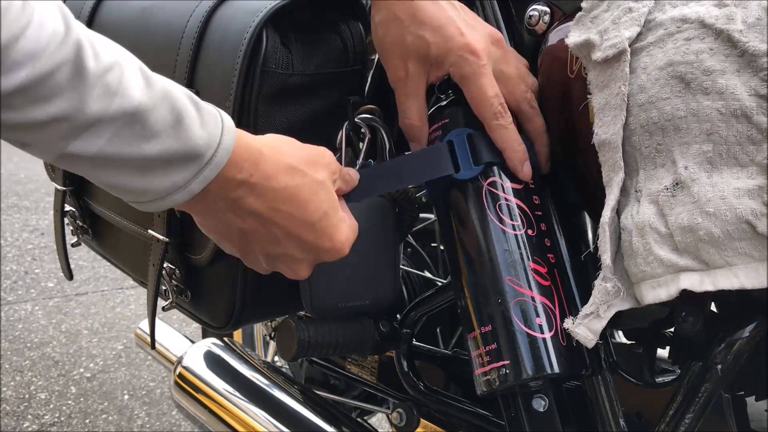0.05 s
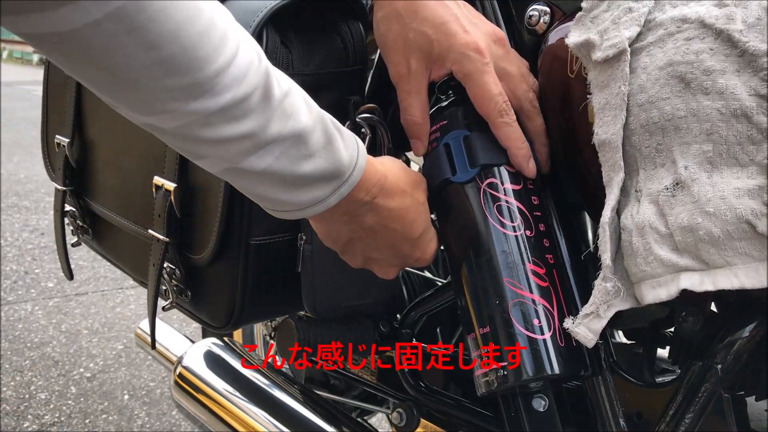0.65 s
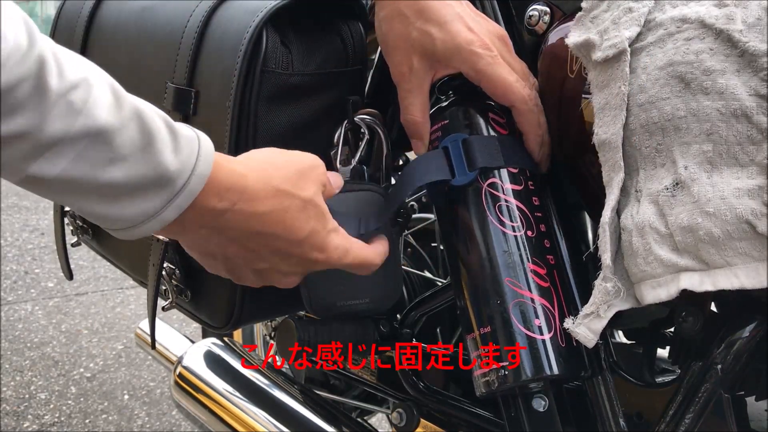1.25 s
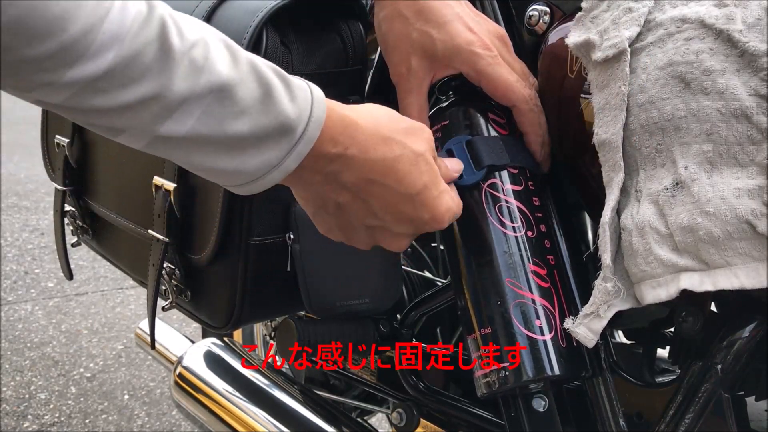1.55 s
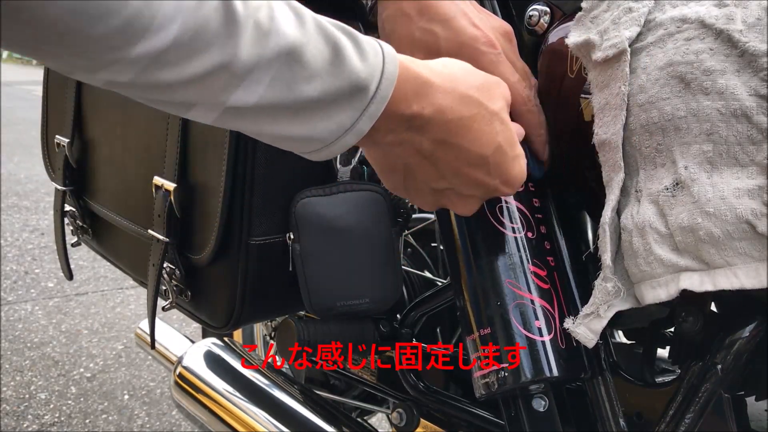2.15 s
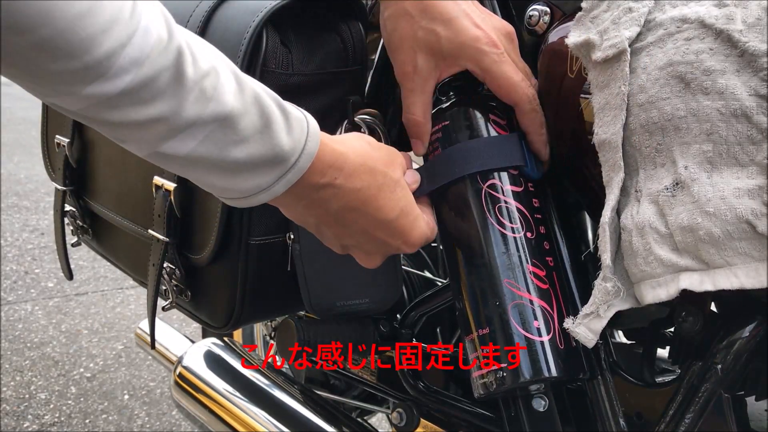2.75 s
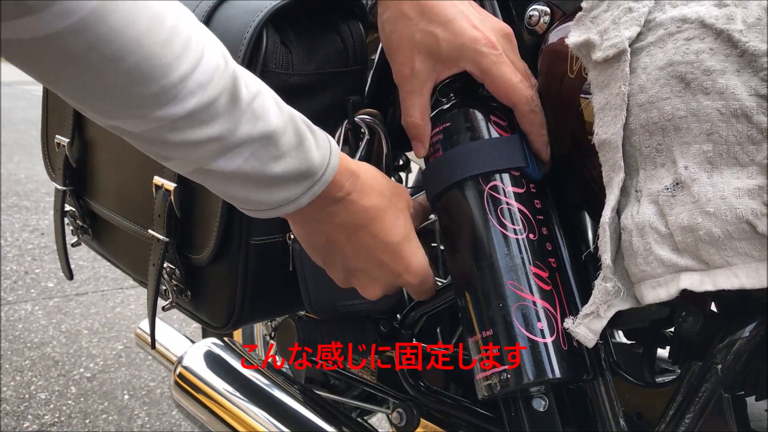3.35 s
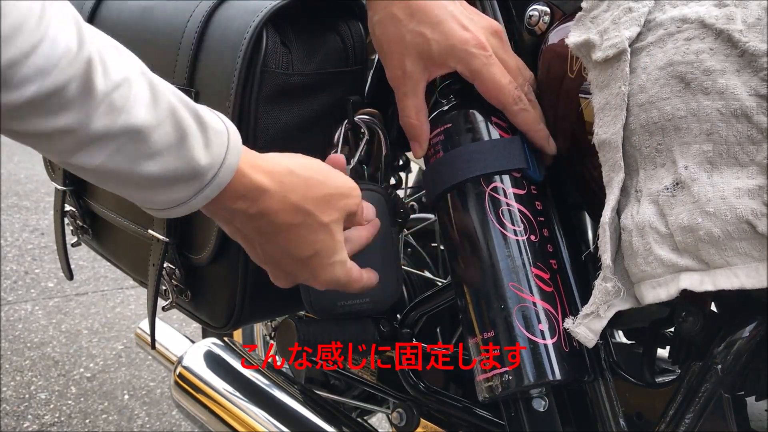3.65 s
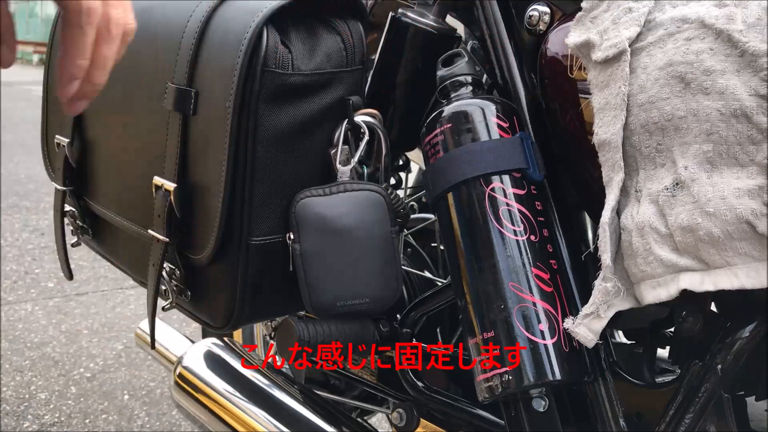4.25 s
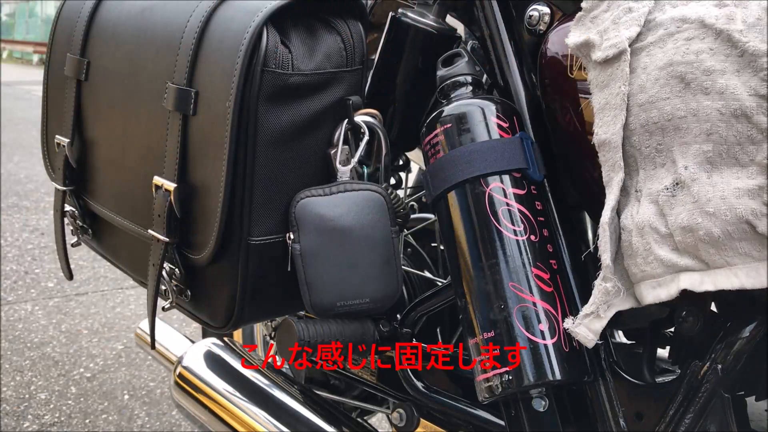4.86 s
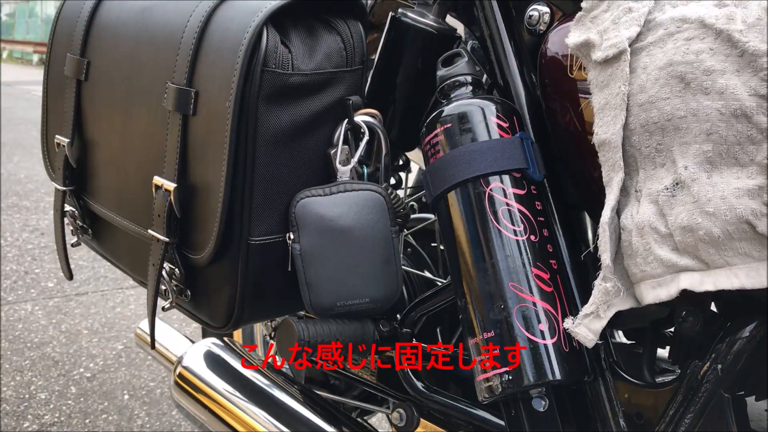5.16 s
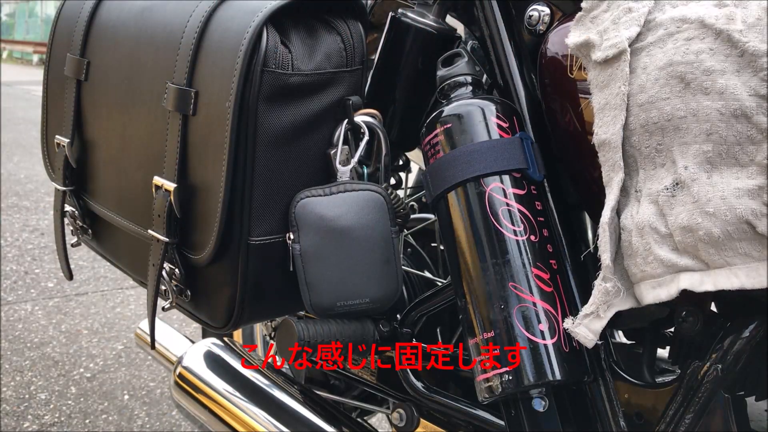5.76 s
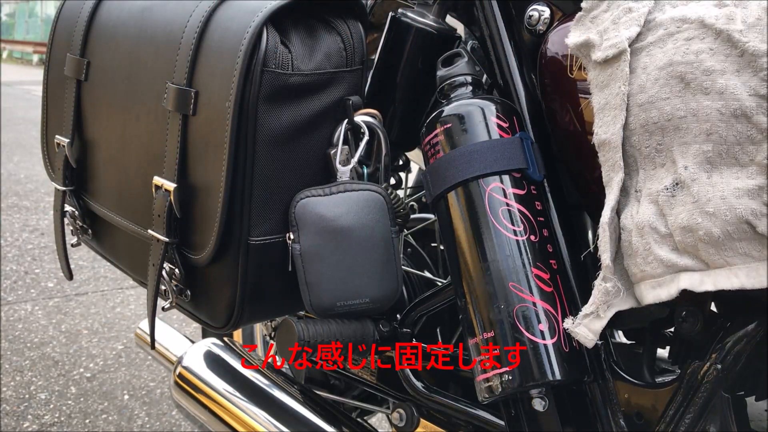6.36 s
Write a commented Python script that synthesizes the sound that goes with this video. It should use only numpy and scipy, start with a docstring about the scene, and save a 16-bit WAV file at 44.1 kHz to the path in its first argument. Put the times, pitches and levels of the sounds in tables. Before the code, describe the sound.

A webbing strap hisses, ticks and creaks tight around a knocking metal bottle, then shoes shuffle on gritty asphalt over a low outdoor rumble.

```python
"""Outdoors, close by, a webbing strap is pulled tight round a metal bottle on a parked motorcycle.
First the webbing hisses through its buckle, and the bottle knocks and rings against its mount.
From about 3 seconds, hard pulls make the strap stick and slip, so it ticks and creaks.
From about 4.5 seconds, shoes shuffle on gritty asphalt, with faint high chirps before and after.
All along there is a low rumble, and a faint distant whine grows and swells twice."""
import sys
import numpy as np
from scipy import signal
from scipy.fft import rfft, irfft, next_fast_len
from scipy.io import wavfile
from scipy.ndimage import uniform_filter1d, map_coordinates

SR = 44100
rng = np.random.default_rng(int(sys.argv[2]) if len(sys.argv) > 2 else 0)


def put_to_file(sound):
    """Save the sound as 16-bit audio at rate SR, in the file named by the first command-line argument."""
    columns = np.atleast_2d(sound).T  # one column per channel
    safe = np.clip(columns, -1, 1)
    whole_steps = np.round(safe * 32767)
    wavfile.write(sys.argv[1], SR, whole_steps.astype(np.int16))


N = 291368
T = np.arange(SR // 3) / SR  # seconds within one hit
TOP_HZ = 16000  # the highest pitch kept

# tone of the deep rumble, outdoors and in a footstep: pitch_hz, level_db
RUMBLE_TONE = [(15, -64.5), (25, -45.5), (38, -4), (56, 5), (80, 0), (110, -3.5), (150, -8), (220, -17),
               (400, -46)]
# tone of the soft rush, in the air and in a footstep: pitch_hz, level_db
AIR_TONE = [(100, -5.5), (220, 3), (400, -3.5), (800, -9.5), (960, -5.5), (1200, -9), (1650, -17),
            (2000, -16), (2450, -15.5), (2800, -18), (5000, -22), (8000, -27.5), (12500, -27),
            (16000, -28.5)]


def webbing():
    """Threads catch on the buckle, rasp and hiss; the bottle under the strap adds a duller rub."""
    # the hand feeds webbing through the buckle: start_s, length_s, level_db
    slide_times = [(0, 0.12, -66.5), (.37, 0.39, -67), (.52, 0.073, -66), (.93, 0.21, -56),
                   (1.345, 0.007, -58.5), (1.63, 0.22, -60.5), (1.82, 0.26, -55), (2.18, .03, -63.5),
                   (2.25, .38, -57.5), (2.67, 0.077, -56), (2.8, 0.06, -67), (2.885, 0.055, -52.5),
                   (3.03, 0.12, -51), (3.46, 0.17, -55), (3.72, 0.13, -73.5)]
    # hard pulls drag the tight strap round the bottle: start_s, length_s, level_db
    haul_times = [(.945, 0.12, -59), (1.06, 0.071, -52), (1.84, 0.21, -70), (3.18, 0.063, -50),
                  (3.44, 0.12, -53)]
    # quick tugs and brushes of the webbing: start_s, length_s, level_db
    tug_times = [(.245, 0.01, -60), (.322, 0.0093, -56), (.8, 0.057, -53), (1.06, 0.081, -41),
                 (1.249, 0.0064, -45.5), (1.263, 0.0092, -42), (1.412, 0.01, -47.5), (2.875, 0.06, -47),
                 (3.325, 0.054, -49.5)]
    # tone of the catching threads: pitch_hz, level_db
    weave_tone = [(700, -9), (1200, -9), (1550, 1), (2100, -11), (3000, -6), (4200, -0.5), (5000, -4),
                  (6300, 3.5), (7200, -2), (9000, 0), (10300, -4), (12000, 0.5), (16000, -2.5)]
    # tone of the strap rubbing the bottle: pitch_hz, level_db
    rub_tone = [(120, -53), (250, 2), (600, -1.5), (1100, -0.5), (1800, -3.5), (3500, -15), (8000, -69)]
    slides = strokes(slide_times, rise_s=0.052, fall_s=0.034)
    hauls = strokes(haul_times, rise_s=0.03, fall_s=0.018)
    tugs = strokes(tug_times, rise_s=0.0012, fall_s=0.0079)
    threads = friction(weave_tone, per_s=1200, spread_db=12.5, smooth=1.9)
    threads += amp(-7.5) * grains(per_s=1700, centre_hz=4530, octaves=1.287, cycles=13, spread_db=8)
    hiss = slides * amp(1.5 + 1.3 * wobble(60)) * patchy(threads, depth_db=2.8)
    rasp = tugs * patchy(friction(weave_tone, per_s=3300, spread_db=6.5, smooth=0.37), depth_db=1)
    rubbing = hauls + amp(-15) * slides  # every slide also rubs the bottle lightly
    return hiss + rasp + rubbing * friction(rub_tone, per_s=900, spread_db=10, smooth=1)


def slips(middling_db=-16, scatter_db=1.5):
    """Each slip is a sharp tick that plucks the tight strap and scatters off the parts around."""
    # single slips of the strap: start_s, level_db, ring_db
    single_slips = [(.5238, -40.5, -4), (.9303, -30, -9), (3.045, -25.5, -19), (3.1011, -25.5, -22),
                    (3.175, -20, -11.5), (3.1872, -20, -10), (3.2521, -18, -31), (3.2854, -21, -14.5),
                    (3.3245, -33, -23), (3.4128, -12.5, -6.5), (3.4224, -19, -13), (3.438, -9.5, -8),
                    (3.4527, -22, -4), (3.798, -32.5, -13), (3.874, -37, -33)]
    # tone of one slip: pitch_hz, level_db
    tick_tone = [(200, -19), (900, -15.5), (2200, -15), (4000, -9.5), (5800, -5.5), (8000, -11),
                 (11000, -15.5), (16000, -22.5)]
    # low notes of the tight strap on the bottle: pitch_hz, level_db, fade_s
    low_notes = [(1400, -22, 0.01), (1480, -5, 0.059), (1733, 2, 0.032)]
    # its high notes: pitch_hz, level_db, fade_s
    high_notes = [(2990, -7.5, 0.059), (3128, -1.5, 0.017), (3600, -3.5, 0.011), (4470, 2, 0.0072),
                  (5460, -1.5, 0.016)]
    out = np.zeros(N)
    tick = click(tick_tone)
    for start_s, db, ring_db in single_slips + creaks():
        # every slip favours different notes
        low = [(hz, level + scatter_db * rng.normal(), fade_s) for hz, level, fade_s in low_notes]
        high = [(hz, level + scatter_db * rng.normal(), fade_s) for hz, level, fade_s in high_notes]
        low_db = -11 + 0.34 * (db - middling_db)  # stronger slips sound deeper
        pluck = amp(low_db) * ring(low, detune=0.032) + amp(-2.5) * ring(high, detune=0.025)
        echoes = amp(-18) * noise(tick_tone, size=len(T)) * (fade(0.027) + amp(-25) * fade(0.74))
        add(out, start_s, amp(db - 1) * (tick + amp(ring_db) * pluck + echoes))
    return out


def creaks(jitter_s=0.0003, scatter_db=1.9):
    """A steady pull makes the strap stick and slip almost evenly: rows of start_s, level_db, ring_db."""
    # runs of slips: start_s, length_s, gap_s, first_level_db, fading_db_per_s, ring_db
    runs = [(3.199, .045, .0096, -18, 70, -16), (3.4699, .1, .015, -21.5, 140, -2)]
    rows = []
    for start_s, length_s, gap_s, first_db, fading_db_per_s, ring_db in runs:
        for t in np.arange(0, length_s, gap_s):
            slip_s = start_s + t + jitter_s * rng.normal()
            slip_db = first_db - fading_db_per_s * t + scatter_db * rng.normal()
            rows.append((slip_s, slip_db, ring_db))
    return rows


def bottle_knocks(bounces=3, dulling=0.91, middling_db=-16):
    """The mount thuds and clatters, duller at each bounce, and the bottle's thin wall rings."""
    # the bottle hits its mount:
    # start_s, level_db, bounce_gap_s, bounce_loss_db, thud_db, metal_db, brightness_hz, favoured_hz
    blows = [(0.215, -36, 0.0064, 15, -21, -11.5, 2960, 2700),
             (.653, -27, 0.014, 0.5, -23.5, -21, 4360, 1350),
             (1.879, -22.5, 0.0064, 6.5, -22, -15, 3000, 1800),
             (2.219, -13.5, .014, 3, -22.5, 0, 11400, 2700),
             (3.0504, -18, .007, 10, -23.5, -19, 3120, 1800),
             (3.66, -16.5, 0.0096, 3, -19, -7.5, 6460, 5400)]
    # notes of the metal wall: pitch_hz, level_db, fade_s
    wall_notes = [(662, -15, .09), (1254, -8, .08), (1352, -13.5, .1), (1860, -12, .06), (2379, -13, .1),
                  (2681, -.5, .12), (3332, -11, .11), (3750, -13, .07), (3933, -8, .08), (3980, -8, .08),
                  (4258, -9, .14), (4382, -6, .11), (4451, -6, .08), (4525, -7, .08), (4580, -1, .11),
                  (5310, -13, .12), (5440, -8, .14), (5787, -11, .06), (6400, -14, .07), (7200, -14, .1),
                  (7650, -15, .08), (9292, -12, .1)]
    # low notes of the mount: pitch_hz, level_db, fade_s
    mount_notes = [(175, -0.5, 0.038), (220, 1.5, 0.078), (253, 0, 0.12), (309.4, 2, 0.1),
                   (432, -8.5, 0.081)]
    # tone of the mount's clatter: pitch_hz, level_db
    clatter_tone = [(300, -6), (700, -7.5), (1100, -2), (1400, 1), (1850, -1.5), (2150, -10.5), (2700, -8),
                    (3200, -7.5), (4400, -2.5), (5100, -9.5), (5700, -2), (8000, -10.5), (9600, -4.5),
                    (11000, -13.5), (16000, -5.5)]
    out = np.zeros(N)
    lowest_hz = mount_notes[0][0]
    attack = 1 - np.exp(-T / 0.00038)
    for start_s, db, gap_s, loss_db, thud_db, metal_db, bright_hz, favoured_hz in blows:
        # the spot that is struck lifts notes near the favoured pitch by up to 1 dB
        wall = [(hz, level + np.exp(-(np.log2(hz / favoured_hz) / 0.15) ** 2), fade_s)
                for hz, level, fade_s in wall_notes]
        tilt_db_per_octave = 0.94 * (db - middling_db)  # harder blows favour the lower notes
        mount = [(hz, level + tilt_db_per_octave * np.log2(lowest_hz / hz), fade_s)
                 for hz, level, fade_s in mount_notes]
        for bounce in range(bounces):
            cutoff_hz = bright_hz * dulling ** bounce
            contact = noise(clatter_tone, size=len(T))
            contact = filtered(contact, lambda hz: 1 / np.sqrt(1 + (hz / cutoff_hz) ** 4))
            clatter = amp(-8.5) * contact * (fade(0.034) + amp(-14) * fade(0.16))
            thud = amp(thud_db + 2 * bounce) * ring(mount, detune=0.015)  # softer contact, more thud
            metal = amp(metal_db - 11.5) * ring(wall, detune=0)
            knock = (clatter + thud + metal) * attack
            add(out, start_s + gap_s * bounce, amp(db - loss_db * bounce) * knock)
    return out


def shoes():
    """Soles thump down, roll grit over the asphalt and squeak softly as they drag."""
    # weight comes down on a foot: start_s, length_s, level_db
    steps = [(5.275, 0.057, -46), (5.8, 0.3, -56.5)]
    # a sole scrapes: start_s, length_s, level_db, squeak_hz
    scuffs = [(4.572, 0.0074, -58, 2030), (4.856, 0.1, -54.5, 2950), (4.93, 0.029, -49.5, 1290),
              (4.977, 0.066, -52, 2560), (5.033, 0.0072, -49, 1150), (5.272, 0.082, -51.5, 890),
              (5.393, 0.051, -51, 825), (5.879, 0.015, -48, 1000), (5.94, 0.036, -53.5, 2630),
              (5.995, 0.17, -56, 970)]
    # tone of a scraping sole: pitch_hz, level_db
    sole_tone = [(100, -18), (250, -13), (500, -32), (920, -9), (1200, -34), (1900, -7), (2300, -9),
                 (3500, -3.5), (4300, -9), (6200, -8), (8000, -12.5), (16000, -17.5)]
    crunch = amp(-1) * grains(per_s=520, centre_hz=2100, octaves=2.2, cycles=3.5, spread_db=19)
    scrape = friction(sole_tone, per_s=900, spread_db=3, smooth=0.8)
    gravel = patchy(crunch + scrape, depth_db=3.2)
    flutter = amp(1.5 * wobble(90))
    thump = noise(RUMBLE_TONE) + amp(-10.5) * noise(AIR_TONE)
    out = strokes(steps, rise_s=0.025, fall_s=0.049) * thump
    for start_s, length_s, db, squeak_hz in scuffs:
        drag = strokes([(start_s, length_s, db)], rise_s=0.005, fall_s=0.011) * flutter
        out += drag * (amp(-2.5) * gravel + amp(-7.5) * narrow_noise(squeak_hz, width_hz=250))
    return out


def grit(middling_hz=4470):
    """Single stones snap and crumble, duller and longer the more the sole covers them."""
    # a stone snaps under a sole: start_s, level_db, brightness_hz
    stones = [(4.886, -47, 4500), (4.944, -32, 4500), (5.042, -35, 4000), (5.251, -38.5, 12000),
              (5.274, -33, 4000), (5.316, -27.5, 2600), (5.416, -24, 5030), (5.4539, -28.5, 2600),
              (5.5, -14, 15100), (5.956, -37.5, 3470), (5.9982, -39, 6000)]
    # tone of a snapping stone: pitch_hz, level_db
    stone_tone = [(100, -7), (500, -3.5), (1100, 5.5), (2100, 4.5), (3800, 0), (6300, -3), (8200, -5.5),
                  (11500, -5.5), (16000, -17.5)]
    out = np.zeros(N)
    snap = click(stone_tone)
    for start_s, db, bright_hz in stones:
        octaves_brighter = np.log2(bright_hz / middling_hz)
        dying_away = fade(0.056 * 0.59 ** octaves_brighter) + amp(-23.5) * fade(0.19)
        crumbs = amp(-9 - 0.5 * octaves_brighter) * noise(stone_tone, size=len(T)) * dying_away
        muffle = signal.butter(1, min(bright_hz, TOP_HZ), fs=SR)
        add(out, start_s, amp(db) * signal.lfilter(*muffle, snap + crumbs))
    return out


def outdoors(whine_grow_s=1.2):
    """Low rumble, soft air, a distant whine that grows, wavers and swells, and a thin high whistle."""
    # the whine and the air swell: middle_s, half_width_s, strength (0 to 1)
    swells = [(4.33, 0.26, 1), (6.4, 0.29, 0.73)]
    t = np.arange(N) / SR
    swell = sum(strength * np.exp(-((t - middle_s) / half_s) ** 2)
                for middle_s, half_s, strength in swells)
    air_db = -63.5 + 2.5 * swell + 0.5 * wobble(7.6)
    whine_db = -65.5 - 11 * np.exp(-t / whine_grow_s) + 3.5 * swell + 1.04 * wobble(12)
    whine = amp(whine_db) * narrow_noise(1482, width_hz=108)
    higher_whine = amp(-72.5) * swell * narrow_noise(2360, width_hz=230)
    rumble = amp(-55.5) * noise(RUMBLE_TONE)
    air = amp(air_db) * noise(AIR_TONE)
    whistle = amp(-77.5) * narrow_noise(14100, width_hz=260)
    return rumble + air + whine + higher_whine + whistle


def chirps(waver_hz=140):
    """Faint, high chirps far away: thin tones that glide and waver."""
    # one chirp a row: start_s, length_s, start_hz, end_hz, level_db
    glides = [(4.133, 0.12, 9300, 11100, -75), (4.24, .09, 12800, 12200, -73),
              (4.42, .04, 12250, 12450, -72), (6.297, 0.13, 12000, 12200, -71)]
    out = np.zeros(N)
    for start_s, length_s, start_hz, end_hz, db in glides:
        size = round(length_s * SR)
        hz = np.linspace(start_hz, end_hz, size) + waver_hz * wobble(250)[:size]
        wave = np.sin(2 * np.pi * np.cumsum(hz) / SR)
        add(out, start_s, amp(db + 0.5) * np.sqrt(np.hanning(size)) * wave)
    return out


def friction(tone, per_s, spread_db, smooth):
    """Rubbing: tiny catches of random size on a bed of smooth noise."""
    catches = (rng.random(N) < per_s / SR) * rng.choice([-1, 1], N)
    sizes = amp(spread_db * np.clip(rng.standard_normal(N), -2, 2))
    return unit(filtered(unit(catches * sizes) + smooth * rng.standard_normal(N), tone_curve(tone)))


def grains(per_s, centre_hz, octaves, cycles, spread_db, size=384):
    """Countless tiny contacts, each ringing a few cycles at its own pitch."""
    start, pitch, strength = rng.random((int(per_s * N / SR), 3)).T[:, :, None]
    n = np.arange(size)
    turns = np.minimum(centre_hz * 2 ** (octaves * (pitch - 0.5)), TOP_HZ) * n / SR
    waves = amp(spread_db * strength ** 2) * np.exp(-turns / cycles) * np.sin(2 * np.pi * turns)
    positions = (start * N).astype(int) + n
    return unit(np.bincount(positions.ravel(), waves.ravel(), N)[:N])


def patchy(x, depth_db, size=512):
    """Patches of pitch grow louder and softer as the point of contact moves."""
    spectra = signal.stft(x, nperseg=size)[2]
    patches = uniform_filter1d(rng.standard_normal(spectra.shape), size=4, axis=0)  # smooth over pitch
    patches = uniform_filter1d(patches, size=9, axis=1)  # and over time
    return unit(signal.istft(spectra * amp(depth_db * unit(patches)), nperseg=size)[1][:N])


def ring(notes, detune):
    """A struck part rings with several fading notes, each starting anywhere in its wave."""
    hz, db, fade_s = np.transpose(notes)[:, :, None]
    turns = hz * (1 + detune * rng.standard_normal(hz.shape)) * T + rng.random(hz.shape)
    waves = amp(db) * fade(fade_s) * np.sin(2 * np.pi * turns)
    return waves.sum(axis=0) / np.sqrt(np.sum(amp(db) ** 2) / 2)


def click(tone, size=2048):
    """A click of this tone that starts at once (minimum phase), with a peak of 1."""
    cepstrum = irfft(np.log(tone_curve(tone)(np.fft.rfftfreq(size, 1 / SR)) + 1e-6))
    cepstrum[1:size // 2] *= 2
    cepstrum[size // 2 + 1:] = 0
    wave = np.pad(irfft(np.exp(rfft(cepstrum))), (0, len(T) - size))
    return wave / np.abs(wave).max()


def noise(tone, size=N):
    """Steady noise of this tone."""
    return unit(filtered(rng.standard_normal(size), tone_curve(tone)))


def narrow_noise(centre_hz, width_hz):
    """Noise gathered round one pitch."""
    white = rng.standard_normal(N)
    return unit(filtered(white, lambda hz: 1 / (1 + (2 * (hz - centre_hz) / width_hz) ** 2)))


def strokes(rows, rise_s, fall_s):
    """Loudness curve of short strokes that swell, hold and die away."""
    t = np.arange(N) / SR
    out = np.zeros(N)
    for start_s, length_s, db in rows:
        rise = np.clip((t - start_s) / rise_s + 0.5, 0, 1)
        fall = np.exp(-np.maximum(t - start_s - length_s, 0) / fall_s)
        out += amp(db) * rise * fall
    return out


def fade(fade_s):
    """Loudness curve of one hit, falling 60 dB in fade_s."""
    return np.exp(-np.log(1000) * T / fade_s)


def wobble(per_s):
    """A smooth curve through per_s random values a second."""
    return map_coordinates(rng.standard_normal(int(N * per_s / SR) + 4), [np.arange(N) * per_s / SR])


def tone_curve(tone):
    """Joins rows of pitch_hz, level_db into a gain for every pitch."""
    pitch_hz, db = np.transpose(tone)
    return lambda hz: amp(np.interp(np.log(hz + 1), np.log(pitch_hz + 1), db))


def filtered(x, gain_at):
    """Turns each pitch in x up or down by gain_at(hz)."""
    size = next_fast_len(len(x) + SR // 4)
    return irfft(rfft(x, size) * gain_at(np.fft.rfftfreq(size, 1 / SR)), size)[:len(x)]


def amp(db):
    """Decibels to gain."""
    return 10 ** (np.asarray(db) / 20)


def unit(x):
    """Scales x to an average (rms) level of 1."""
    return x / np.sqrt(np.mean(x ** 2) + 1e-20)


def add(track, start_s, sound):
    """Mixes a sound into the track at start_s."""
    part = track[max(round(start_s * SR), 0):][:len(sound)]
    part += sound[:len(part)]


def scene():
    """All the sources together in one channel."""
    return (webbing() + slips() + bottle_knocks() + shoes() + grit() + outdoors() + chirps())[None]


def record(dry):
    """Cuts away everything above TOP_HZ."""
    return filtered(dry[0], lambda hz: hz < TOP_HZ)[None]


dry = scene()
out = record(dry)
put_to_file(out)
```